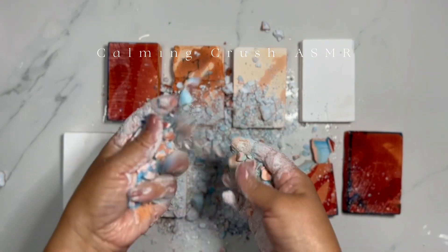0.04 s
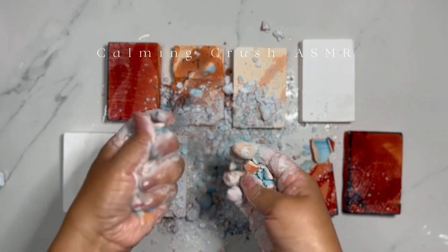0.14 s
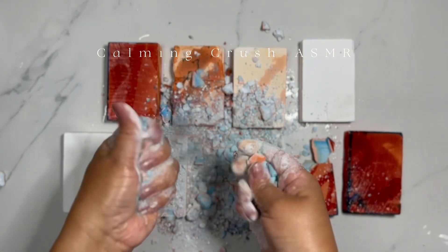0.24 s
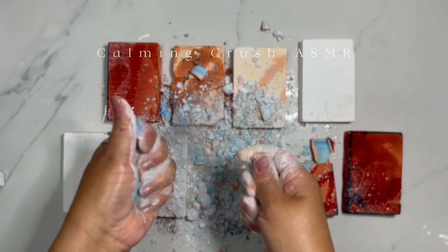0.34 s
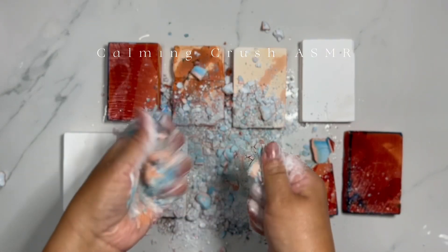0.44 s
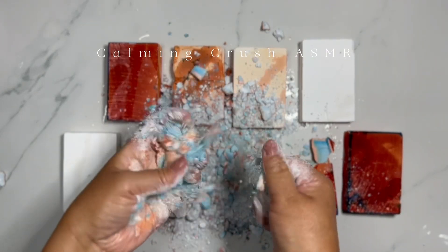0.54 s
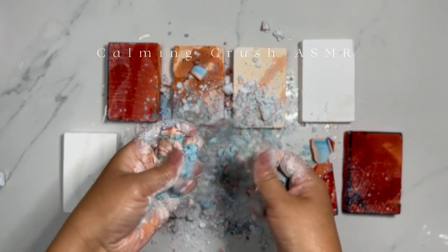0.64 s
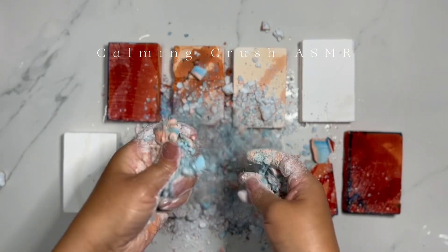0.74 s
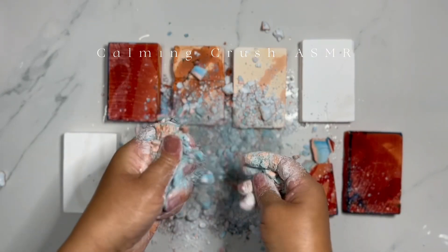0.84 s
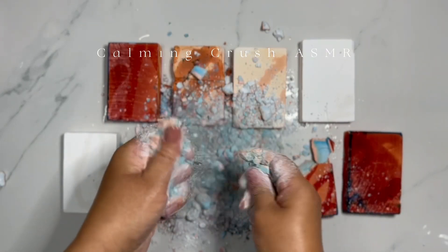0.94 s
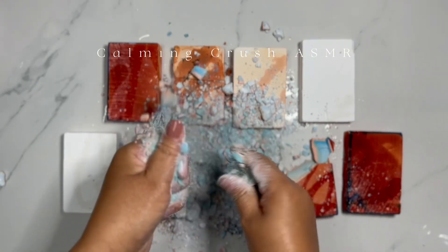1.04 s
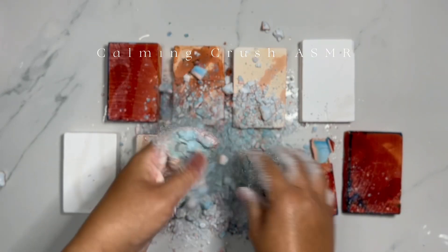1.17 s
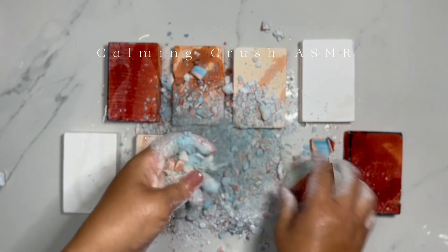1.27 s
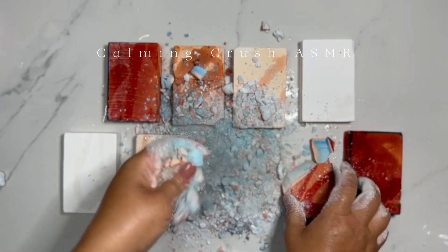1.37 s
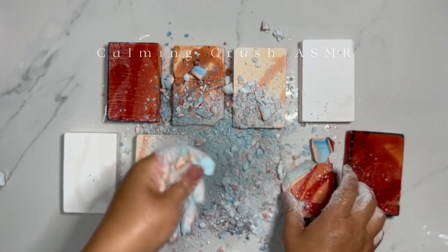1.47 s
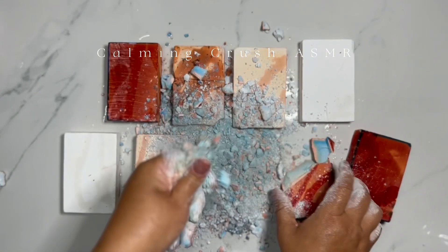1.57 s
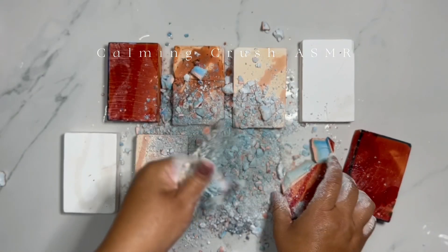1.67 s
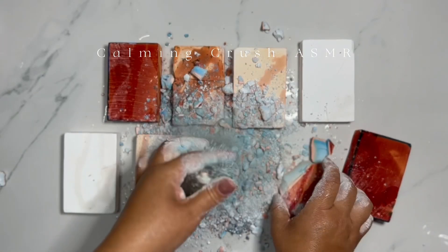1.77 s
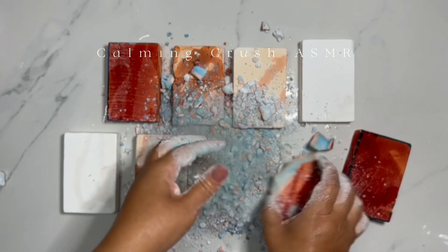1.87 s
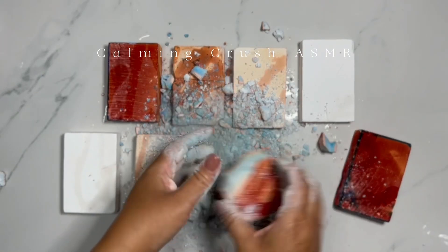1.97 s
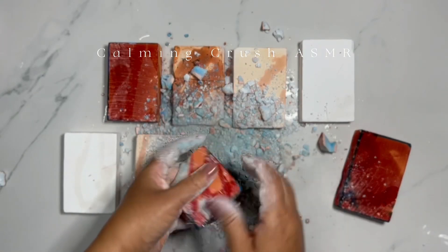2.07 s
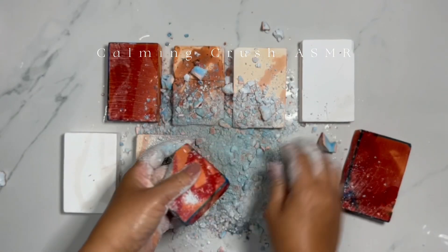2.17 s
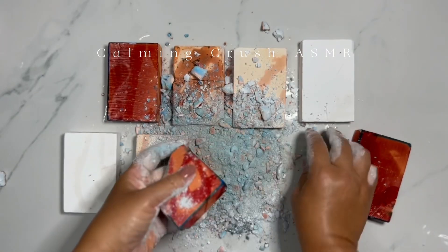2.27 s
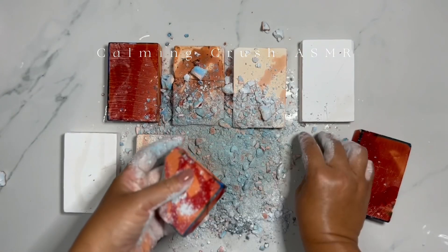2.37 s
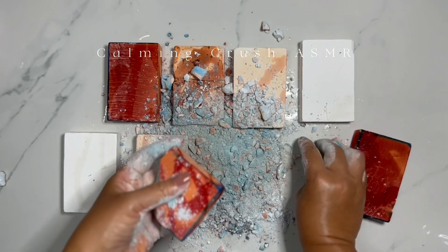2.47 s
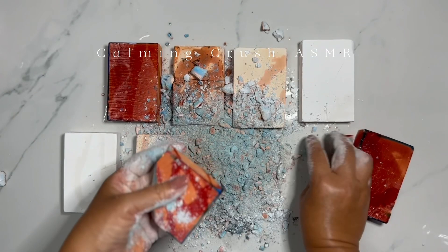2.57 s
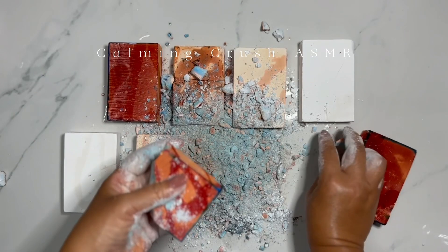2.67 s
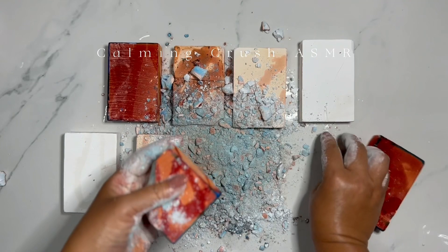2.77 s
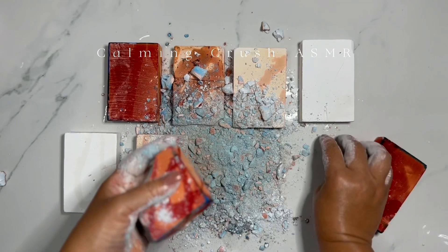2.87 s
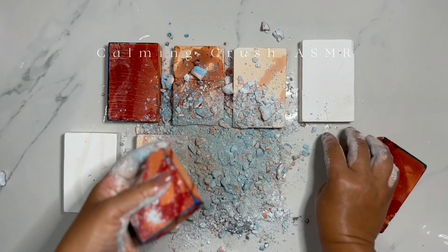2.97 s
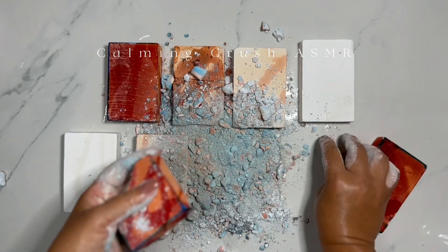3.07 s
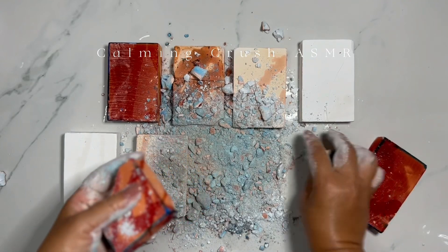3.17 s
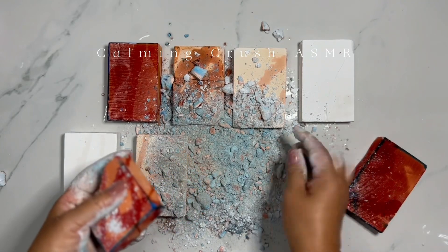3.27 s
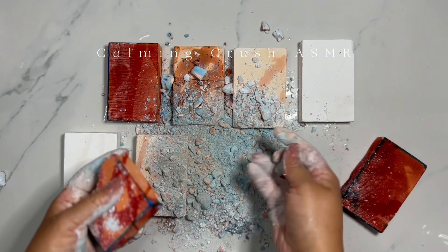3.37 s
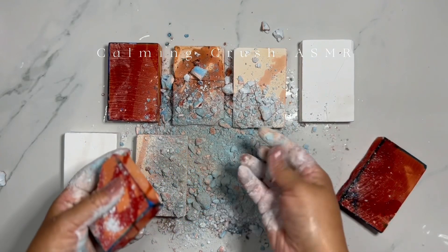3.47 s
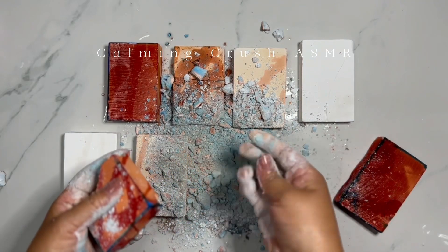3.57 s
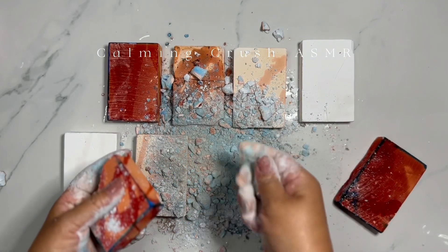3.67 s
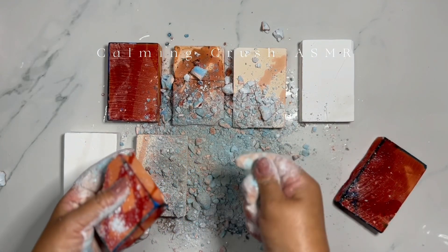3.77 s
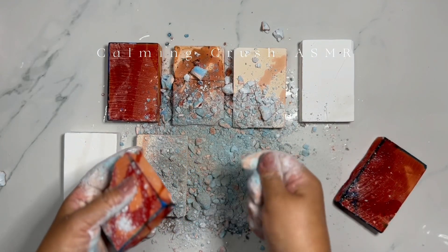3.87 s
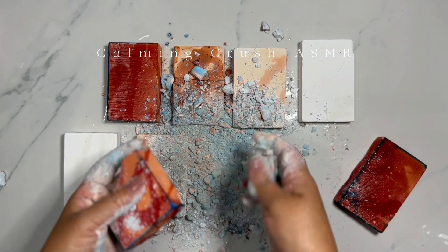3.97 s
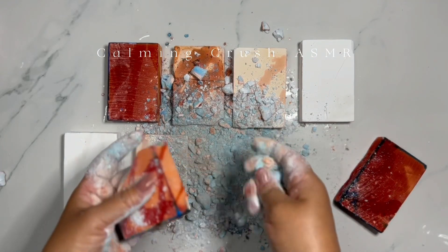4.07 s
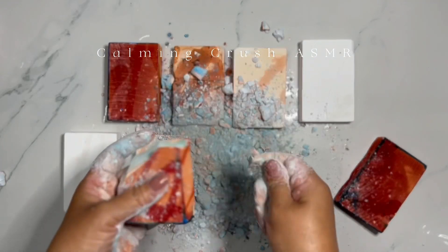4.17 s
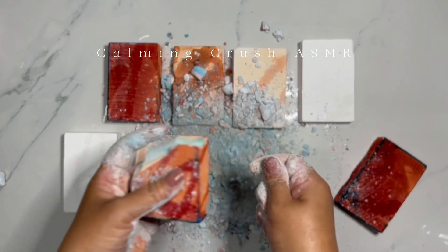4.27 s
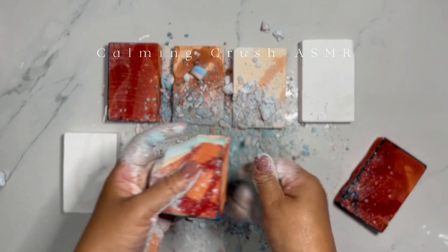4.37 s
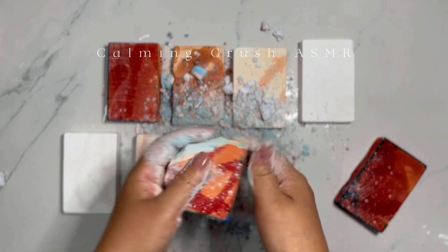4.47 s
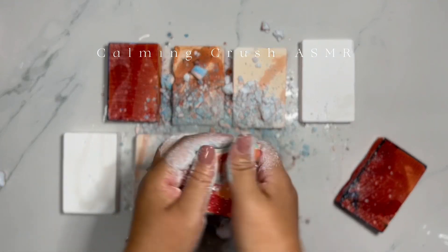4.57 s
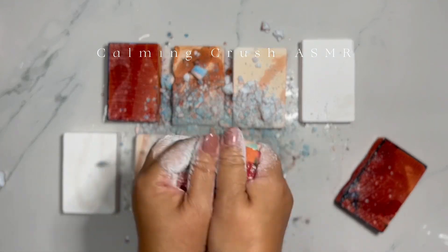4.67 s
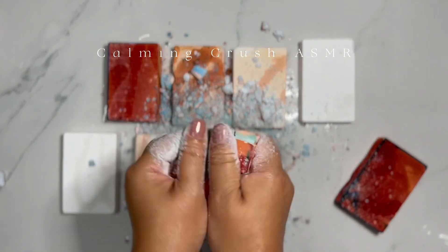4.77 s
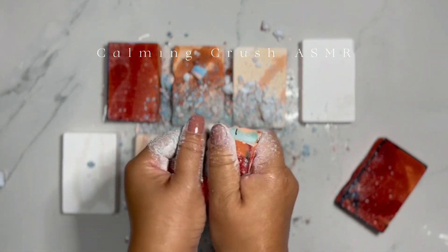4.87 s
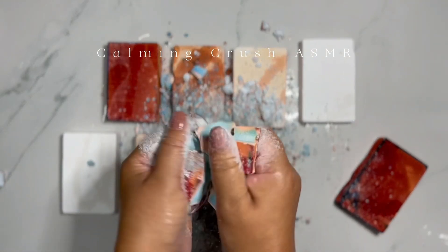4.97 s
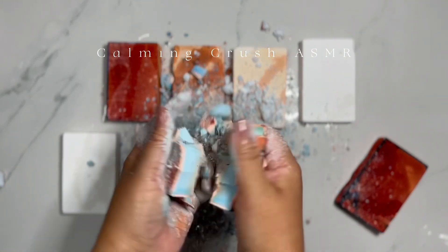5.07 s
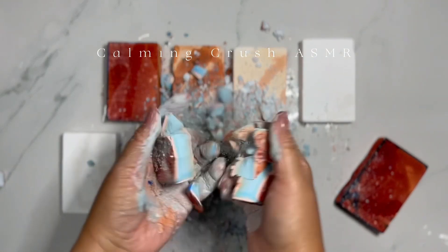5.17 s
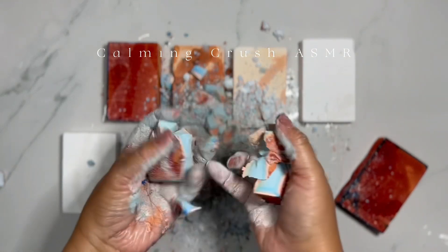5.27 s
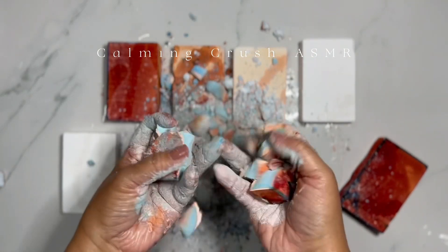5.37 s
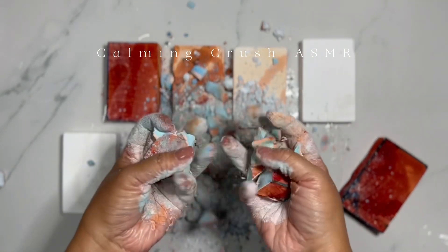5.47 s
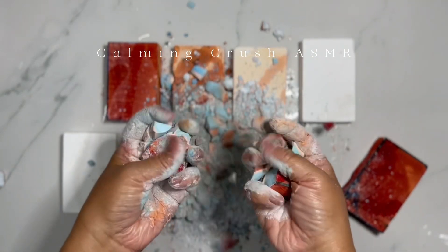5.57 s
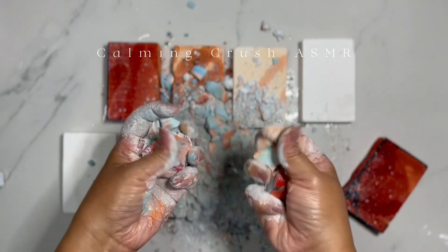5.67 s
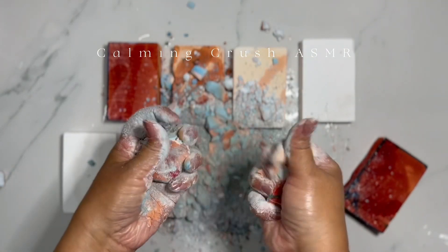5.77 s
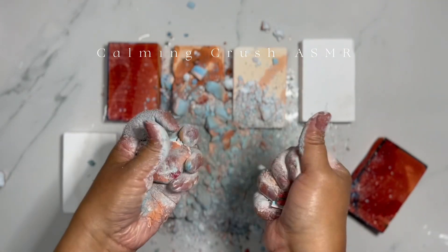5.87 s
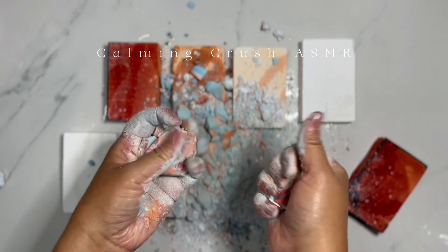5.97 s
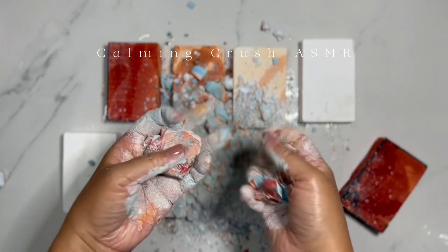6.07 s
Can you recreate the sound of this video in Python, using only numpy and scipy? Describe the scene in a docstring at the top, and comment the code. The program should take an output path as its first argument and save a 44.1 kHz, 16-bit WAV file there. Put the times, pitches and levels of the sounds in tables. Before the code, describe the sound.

Dry chalk pieces are kneaded and broken close to the microphone: grainy crunches, tiny ticks and crumbs pattering on a table top. The activity fades to faint handling and a brief light drag, then a crisp crack leads to a violent burst of bright snaps as a whole block breaks. More brittle crunches and fine dusty crackle follow. The room is small and barely reverberant, with a constant soft hum and low rumble.

```python
"""Two hands crush soft chalk blocks above a stone slab in a small quiet room.
Each snap is a hard crack, a dying burst of fracture noise coloured by the size of the piece, and settling rubble.
Crumbs grind and trickle between the snaps as dense random grains, and small breaks tick among them.
A whole block is knocked and dragged, and lumps thud on the table top: both are sets of ringing modes.
An appliance hum of wavering sines and a rumble of filtered noise lie underneath."""
import sys
import numpy as np
from scipy import signal
from scipy.fft import rfft, irfft, next_fast_len
from scipy.io import wavfile
from scipy.ndimage import map_coordinates

SR = 44100
rng = np.random.default_rng(int(sys.argv[2]) if len(sys.argv) > 2 else 0)


def amplitude_ratio(level_db):
    """Convert a level in decibels to the matching linear amplitude (field) ratio."""
    exponent = np.asarray(level_db, float) / 20
    return 10 ** exponent


def to_wav(s):
    """Save 16-bit WAV."""
    ch = np.atleast_2d(s).T  # columns
    pcm = np.round(np.clip(ch, -1, 1) * 32767)  # PCM
    wavfile.write(sys.argv[1], SR, pcm.astype(np.int16))


N = 269892   # length in samples
TIME = np.arange(N) / SR   # seconds

HARD_SNAP_DB = -45   # reference snap for the rubble, crack and shower rules
TICK_HZ = 2800   # usual pitch of the small breaks, and reference pitch of the rubble rule


def rms_one(x):
    """Scale to rms 1."""
    return x / np.sqrt(np.mean(x ** 2) + 1e-20)


def at_hz(points, hz):
    """Read a spectrum table on a log-frequency axis."""
    table_hz, value = np.transpose(points)
    return np.interp(np.log(hz + 1), np.log(table_hz), value)


def over_time(table):
    """Draw straight lines between the rows of a time table; one curve for each further column."""
    s, *columns = np.transpose(table)
    return [np.interp(TIME, s, column) for column in columns]


def filtered(x, response):
    """Apply a frequency response given as a function of Hz."""
    size = next_fast_len(N + 4096)
    hz = np.arange(size // 2 + 1) * SR / size
    return irfft(rfft(x, size) * response(hz), size)[..., :N]


def low_pass(x, order, hz):
    """Keep what lies below hz."""
    return signal.sosfilt(signal.butter(order, hz, fs=SR, output="sos"), x)


def drift(rate):
    """Slow random wavering with spread 1; a higher rate wavers faster."""
    r = np.exp(-80 * np.pi * rate / SR)   # computed at every 40th sample, then interpolated
    slow = signal.lfilter([1], [1, -2 * r, r * r], rng.standard_normal(N // 40 + 4002))[4000:]
    return np.interp(np.arange(N) / 40, np.arange(len(slow)), rms_one(slow - slow.mean()))


def ring(clicks, hz, t60):
    """A unit click sets a sine of height 1 ringing; it falls by 60 dB in t60 seconds."""
    r = amplitude_ratio(-60 / (t60 * SR))
    w = 2 * np.pi * hz / SR
    return signal.lfilter([0, np.sin(w)], [1, -2 * r * np.cos(w), r * r], clicks + 1e-18)


def grit(shape, spread_db):
    """Fracture noise: samples of very uneven size and random sign."""
    return amplitude_ratio(spread_db * np.minimum(rng.exponential(1, shape), 5)) * rng.standard_normal(shape)


def three_ranges(x):
    """Split into the overlapping bass, middle and treble of the chalk sound."""
    bass = signal.sosfilt(signal.butter(2, [280, 1000], "band", fs=SR, output="sos"), x)
    middle = signal.sosfilt(signal.butter(2, [560, 6800], "band", fs=SR, output="sos"), x)
    treble = signal.sosfilt(signal.butter(4, 6500, "high", fs=SR, output="sos"), x)
    return bass, middle, treble


# colour of the room's own noise: f/Hz, level/dB (relative)
AIR_COLOUR = [(15, -87), (25, -14.5), (58, 5), (86, -9.5), (101, 3), (122, 1.5), (148, -8), (172, -6.5),
              (215, -26), (289, -13.5), (331, -17), (567, -23), (631, -94), (1080, -28.5), (2360, -43),
              (6380, -41), (15500, -48)]
# how alike the noise is on the two sides: f/Hz, likeness (1 = the same)
AIR_LIKENESS = [(60, 1), (240, 0.67), (950, 0.18), (3770, 0.47), (15000, 0.042)]


def room_air():
    """Rumble and faint hiss: noise made of a shared and an opposed part, most alike on both sides in the bass."""
    def colour(hz):
        return amplitude_ratio(at_hz(AIR_COLOUR, hz))

    def alike(hz):
        return np.clip(at_hz(AIR_LIKENESS, hz), -1, 1)

    mid, side = rng.standard_normal((2, N))
    mid = filtered(mid, lambda hz: colour(hz) * np.sqrt(1 + alike(hz)))
    side = filtered(side, lambda hz: colour(hz) * np.sqrt(1 - alike(hz)))
    return amplitude_ratio(-48.5) * rms_one(mid + side * [[1], [-1]])


# tones of the appliance hum: f/Hz, level/dB, wavering/dB
HUM_TONES = [(120.8, -53, 0.5), (50, -60, 7.5), (57.4, -64, 3.5)]


def hum():
    """Low sine tones whose strength and phase waver."""
    out = 0
    for hz, db, waver_db in HUM_TONES:
        level = np.sqrt(2) * amplitude_ratio(db + waver_db * drift(2.14))
        phase = 2 * np.pi * hz * TIME + 0.32 * waver_db * drift(0.72)
        out = out + level * np.sin(phase)
    return out


# lumps landing on the table top: t/s, level/dB
LANDINGS = [(0.077, -43), (0.217, -43.5), (1.092, -42.5), (1.5, -50.5), (2.362, -48.5), (2.977, -50),
            (3.385, -41), (4.713, -45), (5.169, -38), (5.494, -40), (5.56, -46), (5.83, -40.5)]
# ringing tones of the table top besides the boom: f/Hz, level/dB, t60/s
TABLE_TOP_MODES = [(295.7, -4, 0.13), (353, -13, 0.31), (53.6, -7, 0.19)]


def thuds():
    """A soft blow strikes all modes of the table top; the loudest, the boom, takes a while to build up."""
    boom_hz, boom_db, boom_rise_s, boom_t60_s = 133.6, 11, 0.033, 0.37
    clicks, rows = np.zeros(N), np.array(LANDINGS)
    clicks[(rows[:, 0] * SR).astype(int)] = amplitude_ratio(rows[:, 1])
    t = np.arange(SR) / SR
    rise = 1 - np.exp(-(t / boom_rise_s) ** 2)
    boom = rise * amplitude_ratio(boom_db - 60 * t / boom_t60_s) * np.sin(2 * np.pi * boom_hz * t)
    modes = sum(amplitude_ratio(db) * ring(clicks, hz, t60) for hz, db, t60 in TABLE_TOP_MODES)
    return signal.fftconvolve(clicks, boom)[:N] + modes


# ringing tones of a chalk block: f/Hz, level/dB, t60/s
CHALK_BLOCK_MODES = [(296, -2, .12), (460, -2, .04), (730, 0, .06), (930, -3, .04), (1150, 0, .04),
                     (1400, -2, .03), (1680, -1, .03), (2050, -4, .06), (2500, -1, .04), (2780, -1, .04),
                     (3220, -2, .05), (3520, 0, .06), (3940, -5, .05), (4230, -2, .03), (4500, -2, .055),
                     (4980, -5, .07), (5400, -3, .07), (6060, -2, .05), (7060, -3, .1), (7610, -3, .05)]
# a block or large chip knocked or broken: t/s, level/dB, f/Hz that rings most,
# octaves over which neighbours fade by 6 dB, rattling time/s
BLOCK_KNOCKS = [(0.157, -41, 2800, .5, .001), (0.449, -48, 800, .3, .008), (1.085, -43, 1500, .9, .016),
                (1.092, -50, 3200, .1, .003), (1.121, -45, 3520, .06, .003), (4.72, -32, 296, .2, .008),
                (4.7125, -25, 3520, .12, .001), (4.7525, -26, 4230, .1, .001),
                (4.7805, -29, 3400, .3, .001), (4.754, -31, 460, .2, .003), (3.657, -34, 470, .15, .001),
                (5.707, -41, 1300, .3, .004), (5.722, -32, 1300, .35, .003), (5.75, -31, 1200, .3, .01),
                (1.3085, -37, 2000, 1.1, .0003), (1.6, -54, 5400, .06, .025), (1.795, -55, 7060, .05, .01),
                (1.917, -46, 7000, .25, .02), (1.918, -48, 1250, .5, .012), (2.026, -45, 7600, .2, .004),
                (2.042, -49, 3700, .8, .015), (2.872, -63, 5200, .3, .001), (3.385, -46, 1600, .4, .0004),
                (3.638, -39, 2700, .25, .001), (3.656, -26, 2500, .3, .0006), (3.656, -33, 7400, .15, .001),
                (3.674, -33, 2400, .3, .001), (3.739, -45, 1300, .3, .006), (4.139, -46, 2700, .3, .003),
                (4.619, -35, 4500, .05, .002), (4.713, -24, 780, .25, .001), (4.743, -32, 1050, .35, .001),
                (4.7495, -26, 1050, .25, .0015), (5.149, -36, 950, .55, .006),
                (5.158, -33, 6060, .06, .003), (5.158, -35, 7610, .05, .008), (5.29, -51, 7000, .06, .02),
                (5.545, -36, 3000, .2, .002), (5.171, -34, 6060, .06, .005), (5.836, -36, 500, .7, .008)]
# a block dragged over the slab: t/s, level/dB, f/Hz excited most
DRAG = [(2.55, -95, 5500), (2.64, -70, 5500), (2.7, -65, 5400), (2.75, -68, 4700), (2.8, -66, 4900),
        (2.83, -67, 5900), (2.88, -95, 5900)]


def block():
    """Knocks strike the modes of a block in a short rattle of contacts; dragging rubs the same modes, damped."""
    damping = 0.2   # share of the ring time left while the block lies pressed on the slab
    drag_octaves, catching_db = 0.25, 4   # reach over neighbouring modes; wavering of each mode
    rows, t = np.array(BLOCK_KNOCKS), np.arange(SR // 10) / SR
    rattle = grit((len(rows), len(t)), spread_db=3.5) * np.exp(-t / rows[:, 4:])
    rattle = rattle / np.sqrt(np.sum(rattle ** 2, axis=1, keepdims=True))
    drag_db, drag_hz = over_time(DRAG)
    rub = amplitude_ratio(drag_db) * rng.standard_normal(N)
    out = 0
    for hz, db, t60 in CHALK_BLOCK_MODES:
        clicks = np.zeros(N)
        for (s, knock_db, most_hz, octaves, _), contacts in zip(rows, rattle):
            start = int(s * SR)
            fade_db = 6 * (np.log2(hz / most_hz) / octaves) ** 2
            clicks[start:start + len(t)] += amplitude_ratio(knock_db - fade_db) * contacts
        held_t60 = damping * t60
        drag_fade_db = 6 * (np.log2(hz / drag_hz) / drag_octaves) ** 2
        drag = amplitude_ratio(catching_db * drift(8) - drag_fade_db) * rub
        drag = drag / np.sqrt(held_t60 * SR / 28)   # long-ringing modes would gather more of the rub
        out = out + amplitude_ratio(db) * (ring(clicks, hz, t60) + ring(drag, hz, held_t60))
    return out


# fingers kneading the crumbs: t/s, level/dB, fine dust share/dB
FINGER_WORK = [(0.0, -55, -11), (0.13, -53, 5.5), (0.25, -50.5, -1), (0.42, -54, -3), (0.52, -59, -11),
               (0.581, -56, -4), (0.65, -51, -3), (0.74, -53, -13), (0.85, -57.5, -8), (0.94, -52, -4.5),
               (1.06, -63.5, -17), (1.33, -55, -8), (1.6, -54, -4), (1.7, -57.5, -2), (1.79, -49.5, -18),
               (1.88, -63.5, -38), (2.22, -62, -10), (2.45, -69, -3), (2.811, -66.5, 4), (2.9, -70, -7),
               (3.2, -70, -14), (3.27, -69, 2), (3.331, -71.5, -4), (3.551, -70.5, -12), (3.74, -60, -17),
               (3.849, -65, -26), (4.02, -66, -7), (4.15, -57.5, 0.5), (4.296, -64, -6), (4.59, -58, 2.5),
               (4.8, -55, -10.5), (5.13, -66.5, 6.5), (5.175, -45, 6), (5.24, -58, -1),
               (5.329, -56.5, 10.5), (5.45, -59, 6.5), (5.601, -49, -5.5), (5.675, -58, 8.5),
               (5.78, -46, -1.5), (5.88, -58.5, 0.5), (6.0, -57.5, 3.5), (6.12, -66, -23)]


def kneading():
    """Level and dust share of the finger work at every sample."""
    return over_time(FINGER_WORK)


def patchy(x, spread_db, rate):
    """Crumbs of one size come in patches: each pitch range swells and thins out at its own moments."""
    lows = [low_pass(x, 2, hz) for hz in (900, 1500, 2300, 3400, 4800)]
    ranges = [upper - lower for lower, upper in zip([0] + lows, lows + [x])]
    return sum(band * amplitude_ratio(spread_db * drift(rate)) for band in ranges)


# colour of the crumb grains: f/Hz, level/dB per Hz
CRUMB_COLOUR = [(250, 6), (700, -6), (1500, -2), (2600, -8), (4500, -9), (7500, -8), (11000, -12),
                (16000, -7)]


def crumbs(per_s, clumping_db, apart_db):
    """Dense random grains, clumped in time, under the fingers and after each snap; lumps add bass, dust treble."""
    shower_db, shower_s, shower_gain_per_db = -7, 0.016, 0.16   # crumbs shaken loose, more by harder snaps
    lumps_db, lumps_follow, light_kneading_db = -61, 0.26, -60   # lumps follow only part of the swing
    lumps_wander_db, lumps_apart = 1.5, 0.75   # the right side hears some more lumps
    patches_db, patches_rate = 3.5, 25

    level_db, dust_db = kneading()
    s, snap_db = np.array(CHALK_SNAPS)[:, :2].T
    shaken = np.zeros(N)
    shaken[(s * SR).astype(int)] = amplitude_ratio(snap_db + shower_db + shower_gain_per_db * (snap_db - HARD_SNAP_DB)) ** 2
    r = np.exp(-2 / (shower_s * SR))   # the power dies twice as fast as the amplitude
    shower = signal.lfilter([1], [1, -r], shaken + 1e-18)
    level_db = 10 * np.log10(amplitude_ratio(level_db) ** 2 + shower)
    lumps_db = lumps_db + lumps_follow * (level_db - light_kneading_db) + lumps_wander_db * drift(6.3)

    born = rng.random((3, N)) < per_s * amplitude_ratio(clumping_db * drift(30)) / SR
    grains = born * grit((3, N), spread_db=1.5)
    grains = grains[0] + amplitude_ratio(apart_db) * grains[1:]   # some grains reach only one side
    bass, middle, treble = three_ranges(filtered(grains, lambda hz: amplitude_ratio(at_hz(CRUMB_COLOUR, hz))))
    dust = amplitude_ratio(dust_db + patches_db * drift(patches_rate)) * treble
    lumps = amplitude_ratio(lumps_db) * (bass[0] + lumps_apart * bass[1] * [[0], [1]])
    return (amplitude_ratio(level_db) * (patchy(middle, patches_db, patches_rate) + dust) + lumps) / np.std(middle)


def ticks(count):
    """Small breaks at random, more often where the fingers work harder; rows as for the snaps."""
    level_db = kneading()[0]
    share = rng.random(count)
    size = np.minimum(rng.exponential(1, count), 3)
    pitch, low, high = rng.standard_normal((3, count))
    work = np.cumsum(amplitude_ratio(level_db))
    at = np.minimum(np.searchsorted(work / work[-1], share), N - 1)
    tick_db = level_db[at] - 5 - 0.5 * size
    hz = TICK_HZ * 2 ** (0.32 * np.clip(pitch, -2, 2))
    return np.transpose([at / SR, tick_db, hz, -9.5 + 6.5 * low, 2.5 + 6.5 * high])


# breaking chalk: t/s, level/dB of the attack, centre f/Hz, bass share/dB, treble share/dB
CHALK_SNAPS = [(0.026, -48, 2300, -12, -7), (0.157, -40.5, 2800, -18, 2.5), (0.192, -43.5, 3400, -8.5, 0),
               (0.213, -41.5, 4220, -20, 0.5), (0.233, -40, 2700, -25, -5), (0.264, -47.5, 2250, -20, -10),
               (0.338, -61, 3940, -12, 18.5), (0.379, -46.5, 3300, -27, -7), (0.447, -51.5, 3020, 4, 12),
               (0.591, -50, 3000, -27, -13), (0.598, -41, 3930, -21, -16), (0.625, -44, 2250, -32, -18),
               (0.698, -45.5, 3900, -23, -17), (0.706, -51, 2980, -4, -15), (0.928, -49, 2670, -25, -17),
               (1.085, -54, 2260, 10, 11.5), (1.092, -55, 2580, 18, -10), (1.12, -45.5, 3200, -36, 2.5),
               (1.154, -45, 2030, -3, -4), (1.289, -47.5, 3270, -20, -7), (1.308, -31, 2400, -8, -20),
               (1.349, -46, 2380, -35, -6), (1.363, -46, 2660, -14, -25), (1.411, -50, 2800, -21, -22),
               (1.455, -51.5, 3050, -8, -4), (1.496, -51, 2600, -12, 2), (1.527, -52.5, 2980, -20, -15),
               (1.535, -56, 2500, -12, -12), (1.708, -54.5, 2380, -19, -17), (1.758, -56, 2440, -2, 4),
               (1.79, -65, 2270, -12, -19), (1.915, -46, 1340, -2, 3.5), (2.025, -61, 4100, -5, 21.5),
               (2.089, -72.5, 1520, 16.5, 16.5), (2.2, -80, 3020, 19, 31), (2.521, -65.5, 2000, 11, 3),
               (3.021, -65, 1300, 9.5, -20), (3.385, -60, 1170, 7.5, -39), (3.602, -50, 2900, 0, -2),
               (3.638, -37.5, 2570, -31, -6), (3.656, -28, 2600, -26, -4), (3.6735, -36, 2600, -26, -3),
               (3.706, -57, 2430, -29, -17), (3.739, -44.5, 2340, -39, 1.5), (3.765, -58, 1590, -8, -1),
               (3.874, -56.5, 2170, -25, -3.5), (4.042, -64, 3930, -7, 8), (4.139, -42, 2540, -32, -13),
               (4.204, -73, 5000, -17, -1), (4.319, -54.5, 3420, -27, 8), (4.618, -41.5, 2670, -18, -1.5),
               (4.7078, -29, 1430, -2, -7), (4.7117, -22.5, 3340, -8.5, -5), (4.7433, -29, 1180, -7.5, 4),
               (4.7468, -33, 1310, -8, 0), (4.748, -26, 2360, -11, -3), (4.7513, -27.5, 4080, -24, -1),
               (4.7765, -28, 2880, -15, -8), (4.78, -32.5, 3530, -12, -4.5), (4.795, -63, 2800, -17, -14),
               (4.882, -28.5, 3210, -9, -2), (5.15, -45, 1230, 6, -11), (5.159, -45, 5000, -17, 3),
               (5.166, -41, 2670, -24, -4), (5.171, -41, 4760, -12, 6), (5.177, -60, 4500, -16, -2),
               (5.236, -63, 2500, 4, -8), (5.271, -47.5, 2070, -2, -12), (5.351, -59, 3500, -11, 14),
               (5.423, -50.5, 2230, -25, 4), (5.446, -39.5, 3500, -34, -9), (5.493, -48, 2310, -2, 7.5),
               (5.527, -49.5, 3840, -2, 16), (5.544, -37, 3330, -16, 7.5), (5.581, -37, 5000, -24, 4),
               (5.613, -38.5, 3600, -16, -11), (5.638, -43.5, 3530, -7, -4), (5.687, -38, 3100, -28, -7),
               (5.707, -38, 2720, -33, 3), (5.723, -26, 3920, -38, -2.5), (5.729, -36, 3440, -26, 0),
               (5.74, -39, 1290, -20, -5), (5.7501, -30.5, 3100, -25, -5), (5.7523, -34, 2440, -28, 3),
               (5.761, -37, 1280, -29, -5), (5.788, -58, 2400, -21, -3), (5.835, -51, 2380, 8, -6)]


def snaps(tick_count, burst_s, ring_db, sharpness, reach, rubble_s, rubble_cut_hz):
    """Each snap or tick: a hard crack, a dying burst of fractures coloured by the piece, then settling rubble."""
    crack_db, crack_per_db = 20.5, 0.2   # crack over the burst; harder snaps crack more
    burst_apart_db = -7.5   # part of a burst that only one side hears
    rubble_db, rubble_loss_per_db = -10, 0.19   # harder snaps break cleaner
    rubble_per_octave_db = -1   # per octave below the reference pitch
    piece_ring_db, piece_sharpness, piece_octaves = 6, 7, 0.3   # three chance resonances of each piece
    low_cut_share = 0.42   # small pieces radiate little below this share of their centre pitch

    rows = np.vstack([CHALK_SNAPS, ticks(tick_count)])
    size, attack = SR // 10, SR // 150   # samples
    t = np.arange(size) / SR
    over_reference_db = rows[:, 1] - HARD_SNAP_DB

    noise = grit((len(rows), 5, size), spread_db=3.0)
    burst = noise[:, :1] + amplitude_ratio(burst_apart_db) * noise[:, 1:3]
    burst = burst * (1 - np.exp(-t / .0006)) * np.exp(-t / burst_s)
    # the crack is a single pressure spike 40 samples into the burst
    burst[..., 40] -= amplitude_ratio(crack_db + crack_per_db * over_reference_db)[:, None]

    rubble = low_pass(noise[:, 3:], 1, rubble_cut_hz) * (1 - np.exp(-t / burst_s)) * np.exp(-t / rubble_s)
    octaves_below = np.log2(TICK_HZ / rows[:, 2])
    rubble_db = rubble_db - rubble_loss_per_db * over_reference_db + rubble_per_octave_db * octaves_below
    rubble = amplitude_ratio(rubble_db)[:, None, None] * rubble

    ranges = three_ranges(np.concatenate([burst, rubble], axis=1))   # burst left, right; rubble left, right
    spread = 2 ** (piece_octaves * rng.uniform(-1, 1, (len(rows), 3)))
    out = np.zeros((2, N + size))
    for (s, db, hz, bass_db, treble_db), bass, middle, treble, ratios in zip(rows, *ranges, spread):
        body = middle + amplitude_ratio(ring_db) * signal.lfilter(*signal.iirpeak(hz, sharpness, fs=SR), middle)
        for ratio in ratios:
            peak = signal.iirpeak(hz * ratio, piece_sharpness, fs=SR)
            body = body + amplitude_ratio(piece_ring_db) * signal.lfilter(*peak, middle)
        body = signal.lfilter(*signal.butter(3, reach * hz, fs=SR), body)   # big pieces sound dull
        body = signal.lfilter(*signal.butter(3, low_cut_share * hz, "high", fs=SR), body)
        same_bass = bass[[0, 0, 2, 2]]   # both sides share the bass
        whole = 0
        for band, share_db in ((same_bass, bass_db), (body, 0), (treble, treble_db)):
            whole = whole + amplitude_ratio(db + share_db) * band / np.std(band[0, :attack])
        start = round(s * SR)
        out[:, start:start + size] += whole[:2] + whole[2:]
    return out[:, :N]


# how much sooner the hands are heard on the right, as the work passes between them: t/s, lead/s
RIGHT_SOONER = [(0, .00006), (0.3, .0001), (1.3, .000045), (3.4, .00007), (3.6, .00012), (4.2, .00011),
                (4.6, 0), (4.7, .00007), (5.55, .000045), (5.72, .00014), (5.85, .00005), (6.12, .00007)]


def at_microphones(chalk):
    """The hands are nearer the right microphone: earlier there, and brighter by up to 3 dB."""
    early = np.arange(N) + SR * over_time(RIGHT_SOONER)[0]
    right = map_coordinates(chalk[1], [early], order=3, mode="nearest")
    return np.array([chalk[0], filtered(right, lambda hz: amplitude_ratio(3 * hz / (hz + 1500)))])


def room(x):
    """Diffuse reflections: dull dying noise, its own on each side."""
    t60_s, level_db, wall_cut_hz = 0.13, -11.5, 6500
    t = np.arange(SR // 2) / SR
    tail = rng.standard_normal((2, len(t))) * amplitude_ratio(-60 * t / t60_s) * (t > .002)
    tail = low_pass(tail, 1, wall_cut_hz)
    tail = tail / np.sqrt(np.sum(tail ** 2, axis=1, keepdims=True))
    return amplitude_ratio(level_db) * signal.fftconvolve(x, tail, axes=1)[:, :N]


def scene():
    """Chalk sounds with their reflections, over the thuds, the hum and the room's own noise."""
    chalk = snaps(tick_count=135, burst_s=0.0034, ring_db=6.0, sharpness=0.38, reach=1.89,
                  rubble_s=0.032, rubble_cut_hz=11800)
    chalk = chalk + crumbs(per_s=2800, clumping_db=4.0, apart_db=7.5) + block()
    direct = at_microphones(chalk)
    return direct + room(direct) + thuds() + hum() + room_air()


def top_cut(x):
    """Nothing passes above the cut-off."""
    return signal.sosfilt(signal.butter(12, 16970, fs=SR, output="sos"), x)


def record(dry):
    """From 8 kHz up both sides are nearly one signal; the right steps between like and opposite phase with pitch."""
    treble_from_hz, lag_s, stepping, top_hz = 8000, .000225, .62, 15900
    own_share = 0.44   # part of its own treble that the right side keeps

    def high(hz):
        return 1 / (1 + (treble_from_hz / (hz + 1)) ** 24)

    def stepped(hz):
        turn = 2 * np.pi * hz * lag_s
        return -np.exp(-1j * (turn - stepping * np.sin(2 * turn)))

    # steep cut near 16 kHz, with only a faint remainder above
    dry = filtered(dry, lambda hz: 0.0056 + 0.88 / (1 + (hz / top_hz) ** 80))
    low = filtered(dry, lambda hz: 1 - high(hz))
    left = filtered(dry[0], high)
    right = filtered(dry[0] + own_share * dry[1], lambda hz: high(hz) * stepped(hz))
    return top_cut(low + [left, right])


dry = scene()
out = record(dry)
to_wav(out)
```